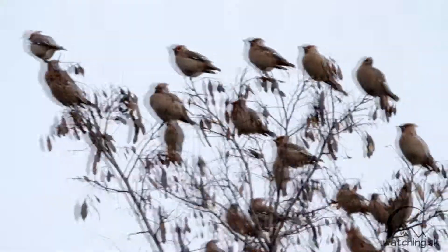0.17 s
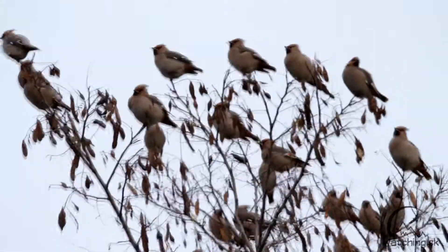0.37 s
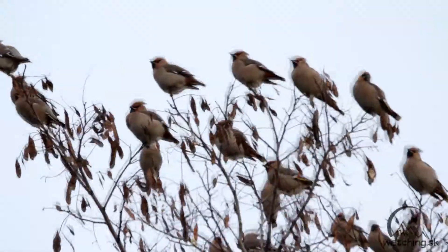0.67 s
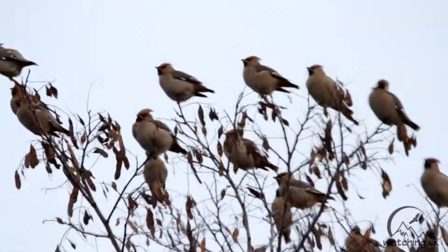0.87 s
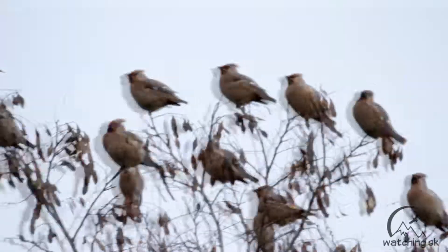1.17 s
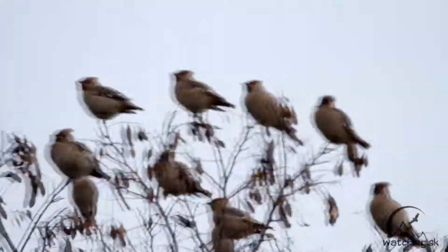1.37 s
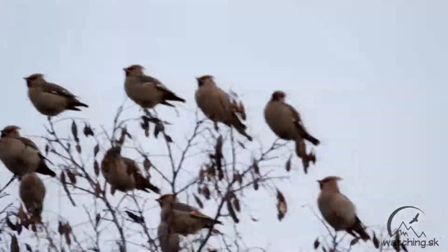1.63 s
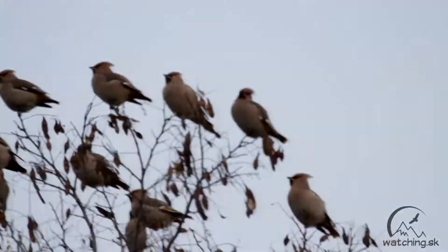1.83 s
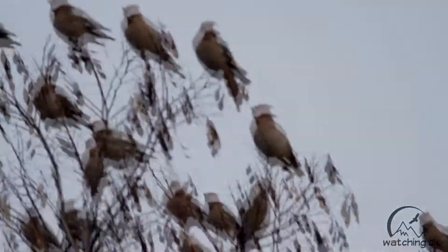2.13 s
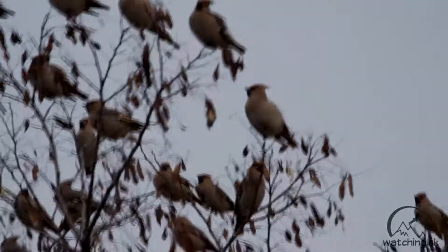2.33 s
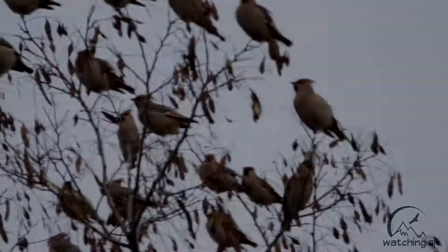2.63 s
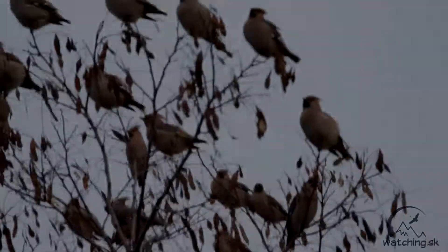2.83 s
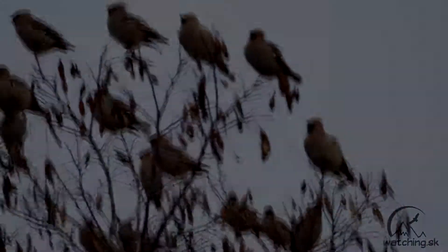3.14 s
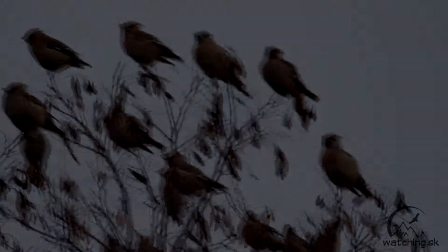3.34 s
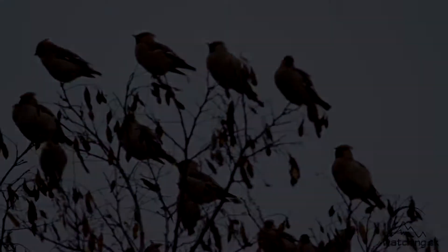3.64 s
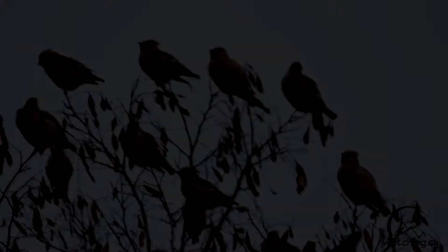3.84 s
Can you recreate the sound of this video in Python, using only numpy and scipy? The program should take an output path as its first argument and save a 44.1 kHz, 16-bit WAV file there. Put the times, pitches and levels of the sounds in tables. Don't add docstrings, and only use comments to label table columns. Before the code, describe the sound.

Small birds trill in a treetop: rapid runs of thin, high, falling whistles, about eighteen a second. Dry twigs tick and snap until 0.4 s, then a near bird trills at 0.4-0.95 s. Others overlap at 1.3-2.05 s, with lower raspy chatter at 1.7 s. Short high notes come at 2.35 s, the near trill returns at 2.6-3.0 s, fainter ones follow. Distant traffic and hiss fade steadily throughout.

```python
import sys
import numpy as np
from scipy import signal
from scipy.fft import rfft, irfft
from scipy.io import wavfile
from scipy.ndimage import uniform_filter1d

SR = 44100
rng = np.random.default_rng(int(sys.argv[2]) if len(sys.argv) > 2 else 0)


def field_ratio(decibels):
    return 10 ** (np.asarray(decibels, dtype=float) / 20)


def master(y):
    cut = np.clip(np.atleast_2d(y).T, -1, 1)
    pcm = np.round(cut * 32767)
    wavfile.write(sys.argv[1], SR, pcm.astype(np.int16))


N = 176400

# start_s (at the pitch top), glide_s, top_hz, end_hz, level_db
NEAR = [(0.406, 0.003, 5060, 4800, -35), (0.424, 0.033, 5400, 5150, -32.5), (0.476, 0.037, 6000, 5300, -27),
        (0.531, 0.039, 6100, 5250, -23.5), (0.587, 0.043, 6000, 5140, -24.5),
        (0.644, 0.041, 6140, 5200, -22.5), (0.702, 0.036, 5930, 5300, -22), (0.757, 0.037, 5900, 5100, -22),
        (0.81, 0.035, 5960, 5230, -22.4), (0.863, 0.04, 5990, 5080, -25), (0.92, 0.016, 5800, 5100, -27)]
NEAR_AGAIN = [(2.569, 0.007, 5140, 4900, -31.1), (2.596, 0.034, 5650, 5150, -28.5),
              (2.65, 0.037, 6000, 5370, -23.5), (2.705, 0.039, 6140, 5400, -22),
              (2.764, 0.038, 6200, 5450, -18), (2.818, 0.043, 6150, 5300, -18),
              (2.88, 0.037, 6050, 5300, -18.5), (2.934, 0.035, 6140, 5300, -17.5),
              (2.989, 0.03, 6100, 4900, -19.5)]
# start_s, glide_s, top_hz, end_hz, level_db
STRAY = [(1.297, .004, 4970, 4800, -41), (1.331, .017, 5650, 5490, -36.5), (1.733, .005, 5930, 5850, -35),
         (3.36, .011, 5200, 5100, -41), (3.386, .003, 5080, 5050, -33)]
# start_s, top_hz, level_db
FAR = [(0.954, 5920, -41.5), (1.003, 5780, -41), (1.057, 6240, -39.5), (1.11, 5900, -39.5),
       (1.164, 6130, -40), (1.213, 5830, -42.5)]
MIDDLE = [(1.364, 6240, -34.5), (1.411, 6330, -32), (1.464, 6230, -38), (1.515, 6300, -29.5),
          (1.571, 6290, -33.5), (1.62, 6250, -31.5), (1.677, 6230, -30)]
LATE_RIGHT = [(3.388, 5800, -40), (3.439, 6180, -32.5), (3.495, 6060, -34.5), (3.552, 6040, -29),
              (3.603, 6220, -30), (3.655, 6200, -31.5), (3.713, 5720, -32.5), (3.769, 6000, -36.5)]
LATE_LEFT = [(3.401, 5510, -41.5), (3.459, 5780, -39.5), (3.516, 6100, -38.5), (3.569, 6150, -36.5),
             (3.625, 5850, -35.5), (3.681, 5900, -34), (3.735, 6020, -38)]
# glide_s, end_hz
EVEN = [
    (.035, 5250),
    (.034, 5400),
    (.037, 5430),
    (.038, 5280),
]
# start_s, glide_s, top_hz, level_db
HIGH_LEFT = [(1.4, 0.021, 6820, -30), (1.433, 0.046, 7090, -28.5), (1.487, 0.045, 7180, -24),
             (1.542, 0.043, 7120, -27.5), (1.6, 0.035, 6890, -25), (2.339, 0.013, 6800, -23),
             (2.369, 0.024, 6950, -25), (2.417, 0.025, 6990, -21.5), (3.159, 0.018, 6100, -44),
             (3.178, 0.037, 6340, -42), (3.231, 0.031, 6850, -45), (3.297, 0.016, 6400, -47),
             (3.335, 0.045, 6850, -44)]
HIGH_RIGHT = [(0.025, 0.041, 6940, -48), (0.07, 0.033, 7000, -52), (0.131, 0.027, 6830, -48),
              (1.801, 0.01, 6620, -36), (1.835, 0.021, 6930, -32), (1.892, 0.026, 6960, -33),
              (1.948, 0.028, 6870, -37), (2.011, 0.037, 6960, -39), (2.17, 0.028, 6820, -48),
              (2.215, 0.019, 7040, -49), (2.6, 0.011, 6600, -42), (2.627, 0.031, 6800, -39),
              (2.678, 0.019, 6950, -43), (3.865, 0.027, 6400, -51), (3.909, 0.026, 6650, -49),
              (3.969, 0.03, 6530, -49)]
HIGH_FALL_HZ_PER_S = 27000
# pan_db (left over right), left_lead_us, octave_db, octave_pan_db,
# drop_hz (closing beak), drop_loss_db, fading_db (over the glide)
VOICES = [
    (-2.5, 58.5, -16.5, 6, 1070, 14.5, -0.5),
    (-3.0, 57.5, -17, 7.5, 1940, 16, 5),
    (0, 64, -14, 2, 1400, -4, -1),
    (-4.5, 43, -31, 0.1, 900, 6, -3),
    (-6, 96, -18, -4, 1400, -12, 9),
    (-9, 62, -14, 0.1, 1500, 5, 5),
    (7, 103, 0.5, 1.5, 1600, -7, 1.5),
    (2, -47.5, -27, 1, 160, 11, -2.5),
    (-10, 33, -25, -2.5, 260, 20, -2.5),
]


def flock():
    even = []
    for notes, (glide_s, end_hz) in zip((FAR, MIDDLE, LATE_RIGHT, LATE_LEFT), EVEN):
        even.append([(s, glide_s, top_hz, end_hz, db) for s, top_hz, db in notes])
    high = []
    for notes in (HIGH_LEFT, HIGH_RIGHT):
        high.append([(s, glide_s, top_hz, top_hz - HIGH_FALL_HZ_PER_S * glide_s, db)
                     for s, glide_s, top_hz, db in notes])
    singers = [NEAR, NEAR_AGAIN, STRAY] + even + high
    return sum(bird(notes, *voice) for notes, voice in zip(singers, VOICES))


WOBBLE_DB, WOBBLE_HZ = 1.4, 90


def bird(notes, pan_db, lead_us, octave_db, octave_pan_db, drop_hz, loss_db, fading_db):
    out = np.zeros((2, N))
    for s, glide_s, top_hz, end_hz, db in notes:
        add(out, s - HOOK_S, note(glide_s, top_hz, end_hz, db, drop_hz, loss_db, fading_db))
    wobble = np.array([drift(WOBBLE_HZ), 2 * drift(WOBBLE_HZ / 2)])
    tone, octave = out * field_ratio(WOBBLE_DB * wobble)
    return place(tone, pan_db, lead_us) + field_ratio(octave_db) * place(octave, octave_pan_db, lead_us)


HOOK_S, HOOK_HZ, DROP_S = .0045, 1100, .0055
BEND_LOW, BEND_HIGH = 1.81, 0.39
STEEP_HZ_PER_S = 35000
ROUND_S, LANDING = .003, .3
ONSET_DB, ONSET_S = 2, 0.011


def note(glide_s, top_hz, end_hz, db, drop_hz, loss_db, fading_db):
    t = np.arange(-HOOK_S, glide_s + DROP_S, 1 / SR)
    bend = BEND_HIGH if drop_hz < 800 else BEND_LOW
    if (top_hz - end_hz) / glide_s > STEEP_HZ_PER_S:
        bend, drop_hz = BEND_HIGH, .22 * drop_hz
    u = np.clip(t / glide_s, 0, 1)
    before = np.clip(-t / HOOK_S, 0, 1)
    after = np.clip((t - glide_s) / DROP_S, 0, 1)

    fall = (np.exp(-bend * u) - np.exp(-bend)) / (1 - np.exp(-bend))
    hz = uniform_filter1d(end_hz + (top_hz - end_hz) * fall, int(ROUND_S * SR) + 1)
    hz = hz - HOOK_HZ * before ** 2
    hz = hz - drop_hz * np.minimum(after / (1 - LANDING), 1) ** 1.12
    phase = 2 * np.pi * (np.cumsum(hz) / SR + rng.random())

    onset_db = ONSET_DB * np.exp(-(t / ONSET_S) ** 2)
    level = field_ratio(db + 2 + onset_db - fading_db * (u - .5) - loss_db * after ** 2)
    level = level * (1 - before ** 3) * np.clip(4 * (1 - after), 0, 1)
    octave_level = np.clip(1.74 * (t + HOOK_S) / glide_s, .5, 1) * field_ratio(-22 * after)
    return level * np.array([np.sin(phase), np.sin(2 * phase) * octave_level])


ECHO_DB, ECHO_S = -17, .004


def place(x, pan_db, lead_us):
    w = 2 * np.pi * np.fft.rfftfreq(N, 1 / SR)
    lags = ECHO_S * rng.uniform(0.1538, 1, (2, 3, 1))
    paths = 1 + field_ratio(ECHO_DB) * np.exp(-1j * w * lags).sum(axis=1)
    side = np.array([[.5], [-.5]])
    direction = field_ratio(pan_db * side) * np.exp(1j * w * lead_us * side / 10 ** 6)
    return irfft(rfft(x) * paths * direction, N)


STROKE_TOP_HZ, STROKE_END_HZ, STROKE_S = 3300, 2300, .006
RASP_DB = -7.5
# start_s, length_s, strokes_per_s, level_db
CHATTER = [
    (1.682, .18, 51.5, -31),
    (1.697, .15, 52.0, -33),
    (3.094, .13, 68, -39),
    (3.111, .11, 46.0, -37),
]


def chatter():
    out = np.zeros((2, N))
    u = np.arange(0, 1.3, 1 / (STROKE_S * SR))
    fall_hz = STROKE_END_HZ + (STROKE_TOP_HZ - STROKE_END_HZ) * np.clip(1 - u, 0, 1) ** 1.29
    swell = np.sin(np.pi * (u / 1.3) ** 1.9)
    partial_swell = np.array([np.ones_like(u), np.clip(3 * u - 1, 0, 1)])
    for s, length, rate, db in CHATTER:
        chances = rng.standard_normal((int(length * rate), 4))
        for k, (pitch, timing, *loudness) in enumerate(chances):
            phase = 2 * np.pi * np.cumsum(fall_hz * (1 + 0.055 * pitch)) / SR
            level = field_ratio(db + 2 * np.c_[loudness])
            stroke = level * swell * np.sin(phase * [[1], [2]]) * partial_swell
            add(out, s - STROKE_S / 2 + k / rate + .0012 * timing, stroke)
    t = np.arange(N) / SR
    rasp_band = signal.butter(2, [2200, 5600], "band", fs=SR, output="sos")
    breath = rms_one(signal.sosfilt(rasp_band, rng.standard_normal((2, N))))
    breath = breath * sum(field_ratio(db + RASP_DB - 10 * (2 * (t - s) / length - 1) ** 4)
                          for s, length, _, db in CHATTER)
    tone = place(out[0], pan_db=4.0, lead_us=-12.0)
    octave = place(out[1], pan_db=-4.0, lead_us=20.0)
    return breath + tone + field_ratio(-.5) * octave


# centre_s (loudest moment), level_db, spread_s
TICKS = [
    (.03, -33.5, 0.047),
    (0.137, -26, 0.00094),
    (0.3, -26.5, 0.0018),
    (.379, -18, 0.00049),
    (2.055, -39, .01),
    (2.55, -32, .012),
    (2.935, -25, 0.0048),
    (2.195, -37, 0.0089),
    (3.085, -35, 0.017),
]


def twigs():
    t = np.arange(N) / SR
    grains = rng.standard_normal((2, N)) * field_ratio(2.5 * drift(150))
    gate = sum(field_ratio(db) * np.exp(-((t - s) / spread) ** 2) for s, db, spread in TICKS)
    bright = signal.butter(2, [6200, 11000], "band", fs=SR, output="sos")
    return signal.sosfilt(bright, grains * gate + 1e-18)


# centre_s (loudest moment), level_db
BUMPS = [
    (.5, -60),
    (.65, -62),
    (1.57, -62),
]


def bumps():
    t = np.arange(N) / SR
    dull = signal.butter(2, 70, fs=SR, output="sos")
    low = rms_one(signal.sosfilt(dull, rng.standard_normal((2, N))))
    return low * sum(field_ratio(db) * np.exp(-((t - s) / 0.039) ** 2) for s, db in BUMPS)


GROVE_DB, GROVE_T60_S = -16.5, .12


def grove(x):
    t = np.arange(SR // 2) / SR
    tail = rng.standard_normal((2, len(t))) * field_ratio(-60 * t / GROVE_T60_S) * (t > .004)
    return signal.fftconvolve(x, tail / np.sqrt(np.sum(tail ** 2) / 2), axes=1)[:, :N]


TRAFFIC_DB = -31
# pitch_hz, level_db (per Hz)
TRAFFIC = [(18, -81.5), (30, -32), (108, -29.5), (300, -3), (904, -4.5), (1130, -9.5), (1300, -6),
           (3600, -15), (4680, -93), (7920, -120)]


def traffic():
    return field_ratio(TRAFFIC_DB) * banded_noise(TRAFFIC, 24.62, count=15, patchy_db=0.65)


HISS_DB = -40
# pitch_hz, level_db (per Hz)
HISS = [(3000, 6.5), (5000, 2), (8000, -1.5), (11000, -4.5), (14000, -11.5)]


def hiss():
    return field_ratio(HISS_DB) * banded_noise(HISS, 3200, count=5, patchy_db=.9)


# pitch_hz, likeness (-1 to 1)
LIKENESS = [(60, -0.67), (240, 1), (950, 0.56), (3770, 0.072), (15000, -0.17)]
# pitch_hz, level_db (left over right)
LEAN = [(60, 1), (240, -1.0), (950, -3.5), (3770, -2.5), (15000, -0.5)]


def banded_noise(spectrum, low_hz, count, patchy_db):
    out, together = 0, drift(14.0)
    edges = low_hz * 2 ** (np.arange(count + 1) / 2)
    white = rng.standard_normal((2, 2, N))
    for k, (low, high) in enumerate(zip(edges, np.minimum(edges[1:], .45 * SR))):
        band = signal.butter(2, [low, high], "band", fs=SR, output="sos")
        mid, side = signal.sosfilt(band, white[k % 2])
        hz = np.sqrt(low * high)
        alike = np.clip(at_hz(LIKENESS, hz), -.99, .99)
        lean = field_ratio(at_hz(LEAN, hz) * np.array([[.5], [-.5]]))
        gain = field_ratio(at_hz(spectrum, hz) + patchy_db * (0.78 * together + drift(17.4)))
        stereo = np.sqrt(1 + alike) * mid + np.sqrt(1 - alike) * side * [[1], [-1]]
        out = out + gain * lean * stereo
    return rms_one(out)


def rms_one(x):
    return x / np.sqrt(np.mean(x ** 2) + 1e-20)


def at_hz(points, hz):
    table_hz, value = np.transpose(points)
    return np.interp(np.log(hz), np.log(table_hz), value)


def drift(rate_hz):
    r = np.exp(-16 * np.pi * rate_hz / SR)
    slow = signal.lfilter([1], [1, -2 * r, r * r], rng.standard_normal(N // 8 + 9002))[9000:]
    return np.interp(np.arange(N) / 8, np.arange(len(slow)), rms_one(slow))


def add(out, s, piece):
    i = max(int(s * SR), 0)
    out[..., i:i + piece.shape[-1]] += piece[..., :out.shape[-1] - i]


def scene():
    calls = flock() + chatter()
    return calls + field_ratio(GROVE_DB) * grove(calls) + twigs() + bumps() + traffic() + hiss()


def roll_off(x):
    return signal.sosfilt(signal.butter(12, 15750, fs=SR, output="sos"), x)


# time_s, level_db
FADE = [(0, 1), (1, -2), (2, -5), (2.3, -10), (2.8, -16), (3.2, -19.5), (3.5, -21.5), (4, -29)]


def record(dry):
    s, db = np.transpose(FADE)
    mix = dry * field_ratio(np.interp(np.arange(N) / SR, s, db))
    return roll_off(mix)


dry = scene()
out = record(dry)
master(out)
```